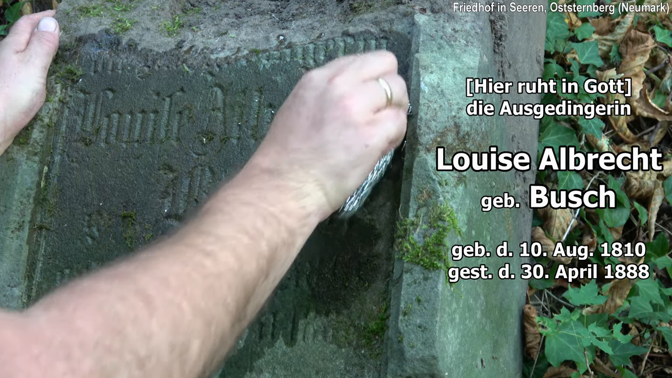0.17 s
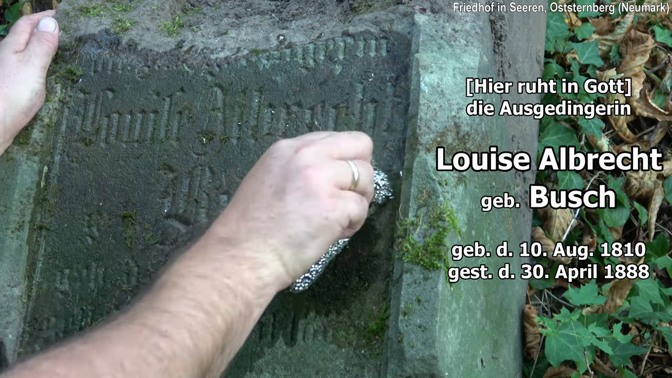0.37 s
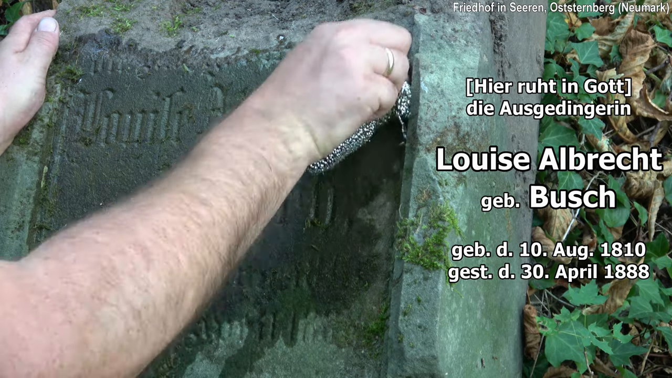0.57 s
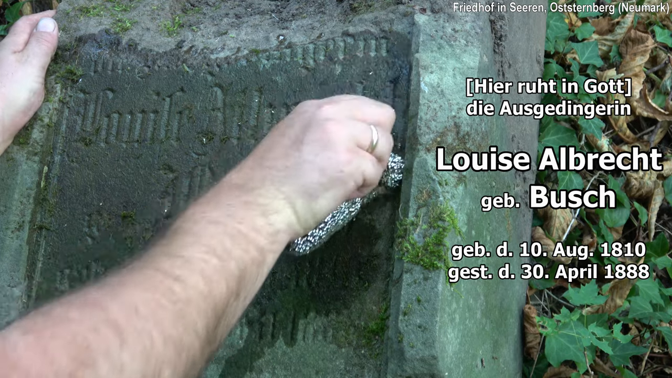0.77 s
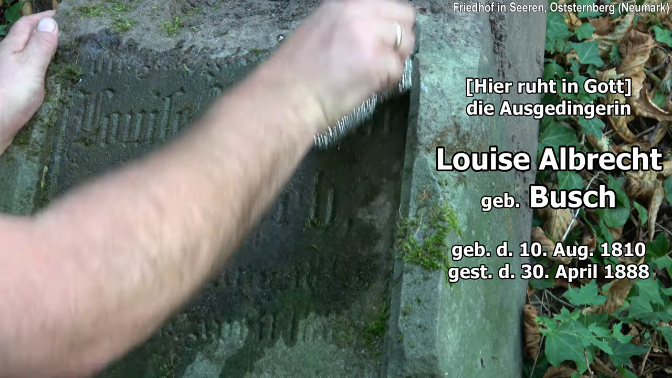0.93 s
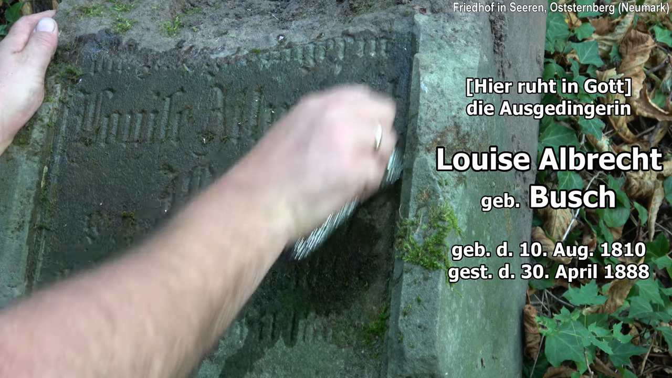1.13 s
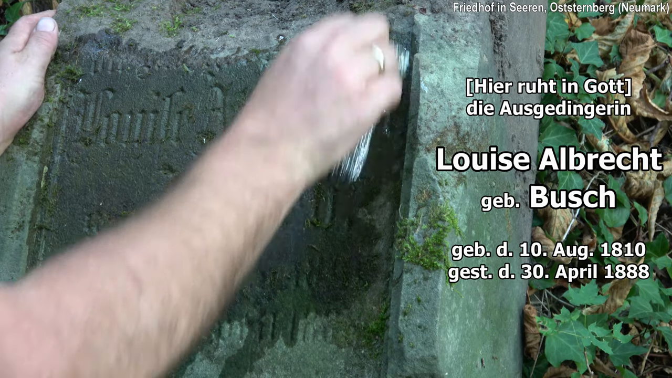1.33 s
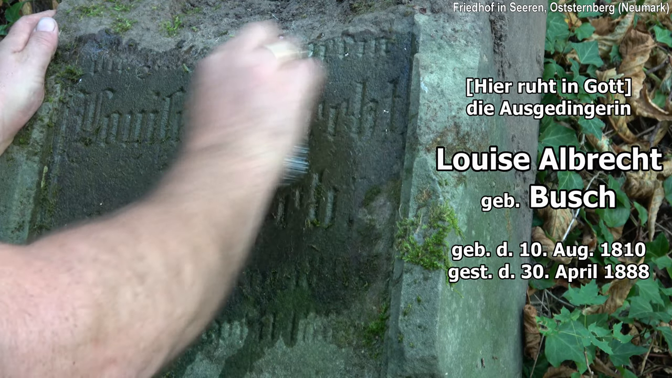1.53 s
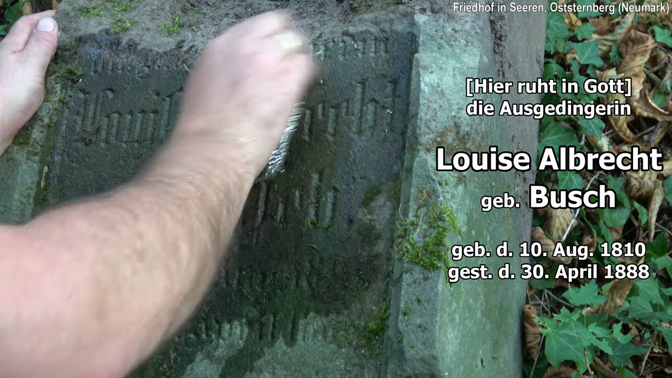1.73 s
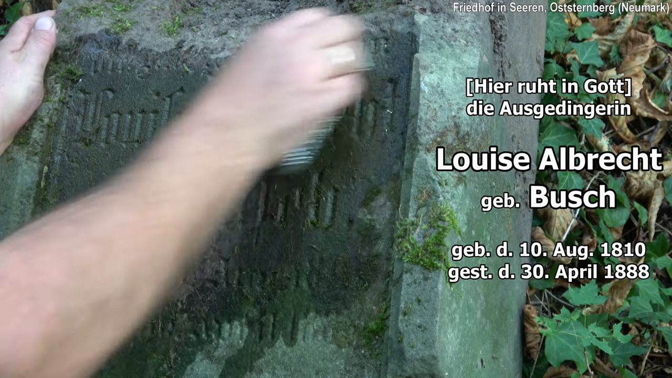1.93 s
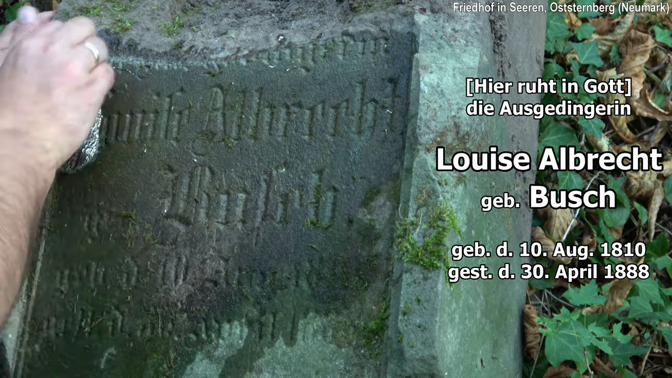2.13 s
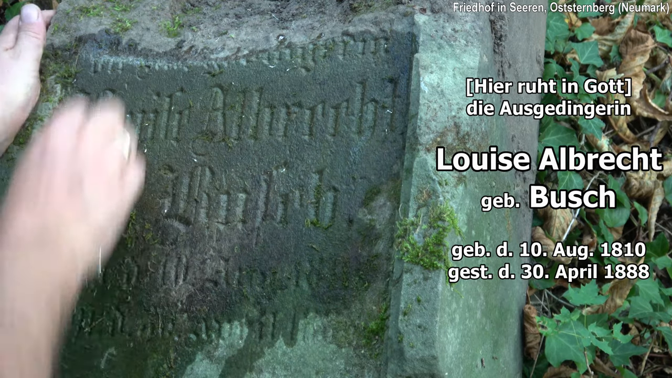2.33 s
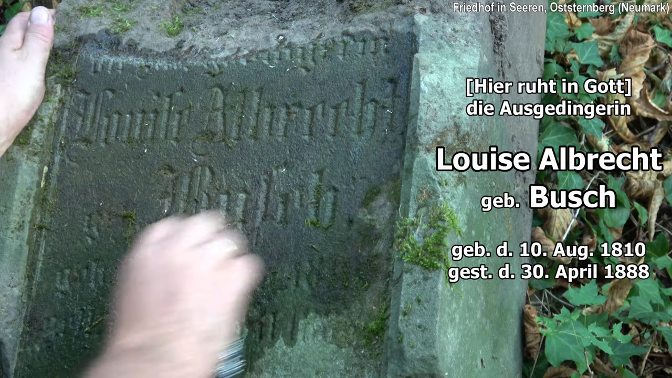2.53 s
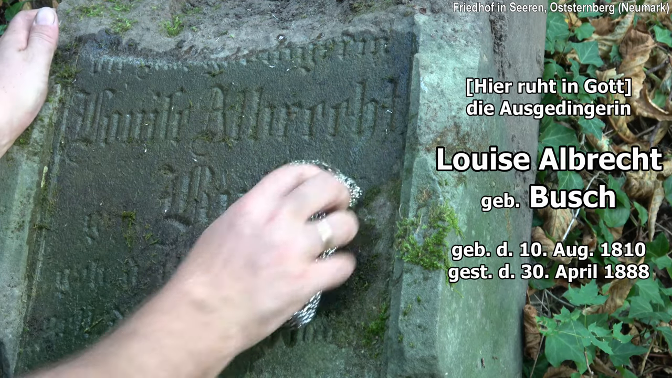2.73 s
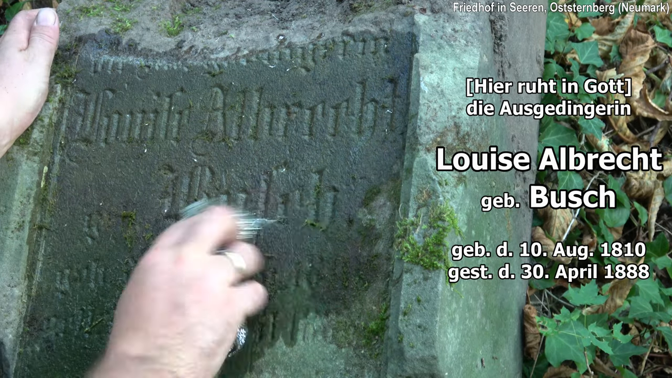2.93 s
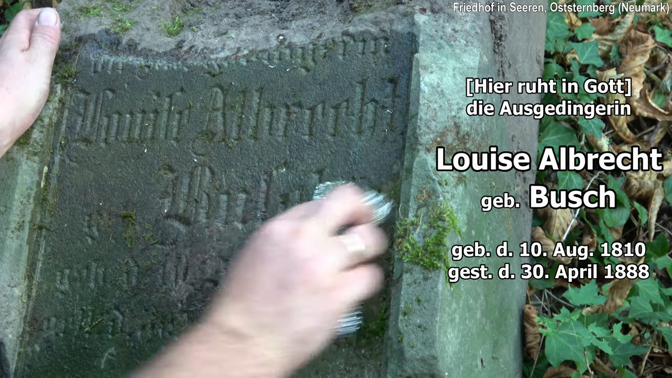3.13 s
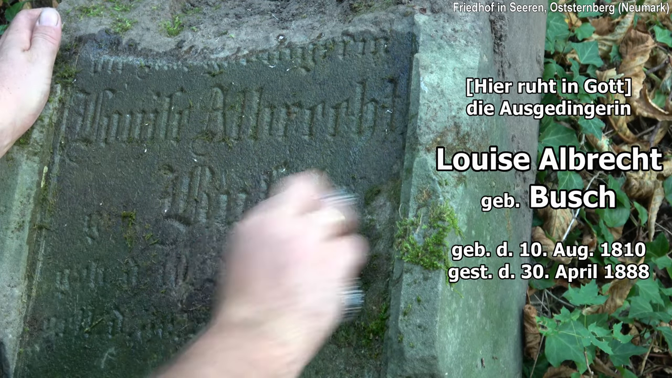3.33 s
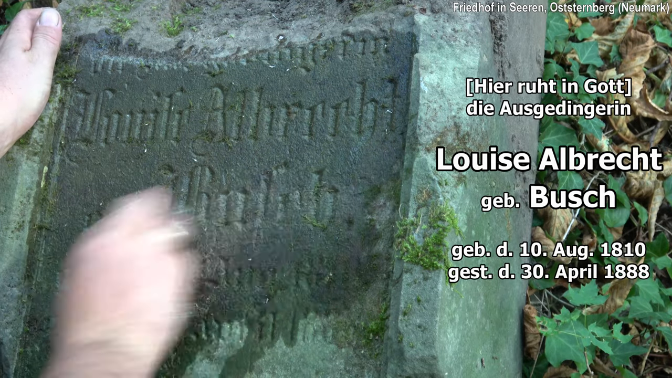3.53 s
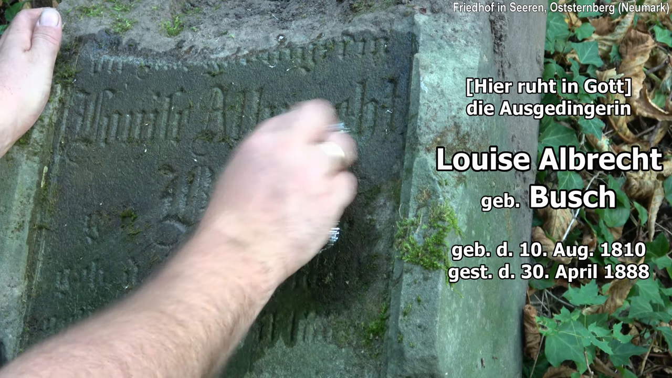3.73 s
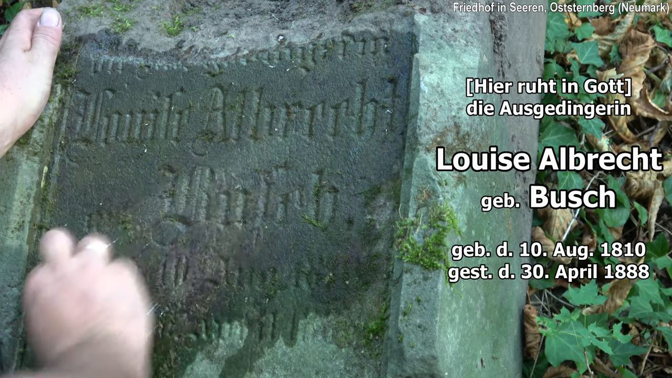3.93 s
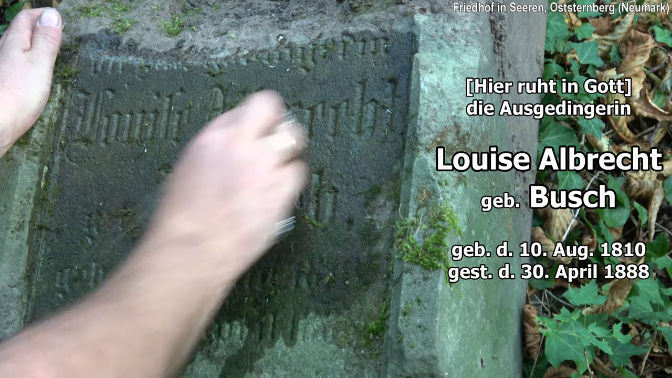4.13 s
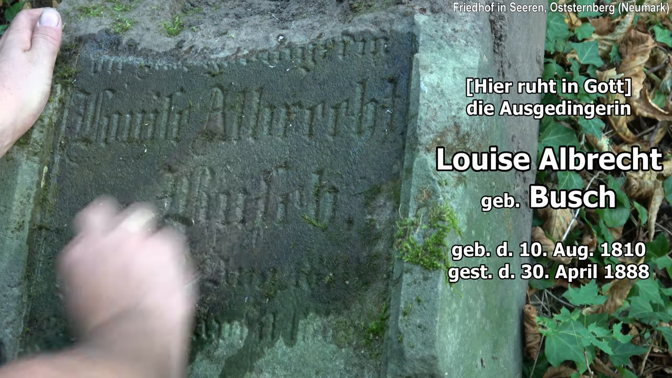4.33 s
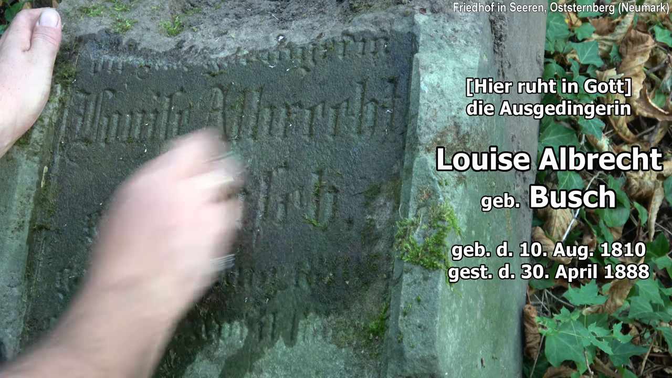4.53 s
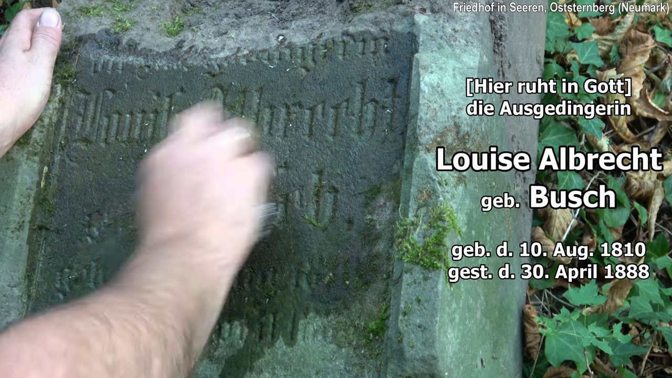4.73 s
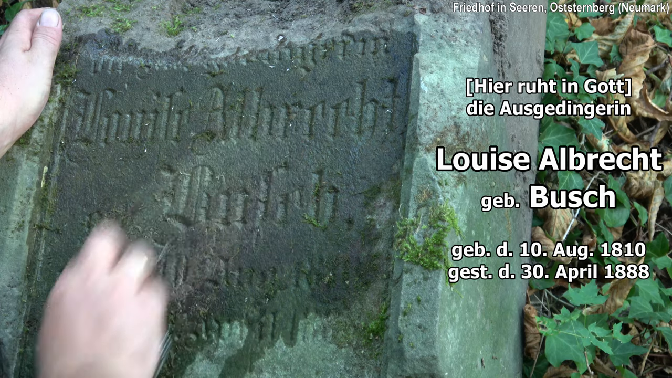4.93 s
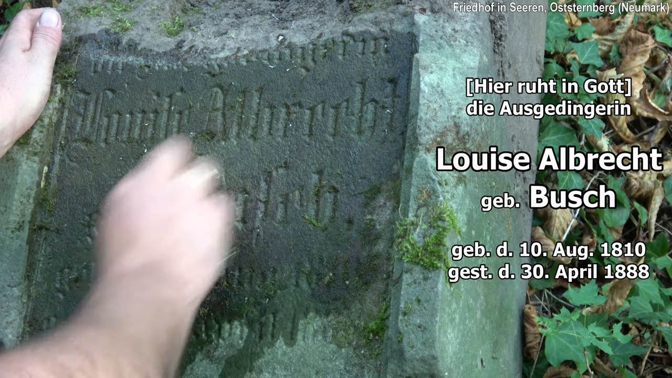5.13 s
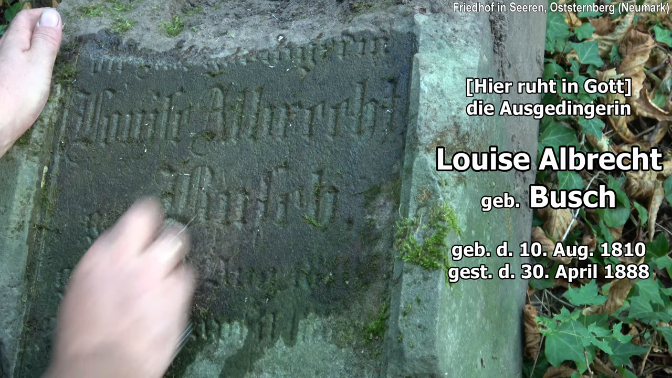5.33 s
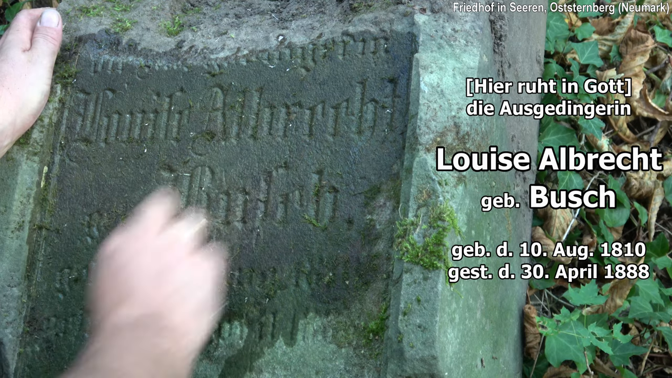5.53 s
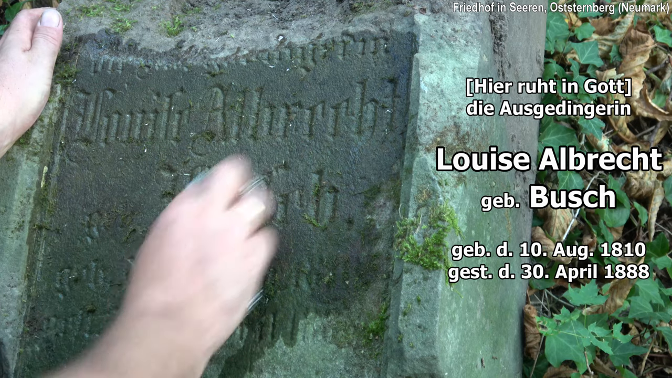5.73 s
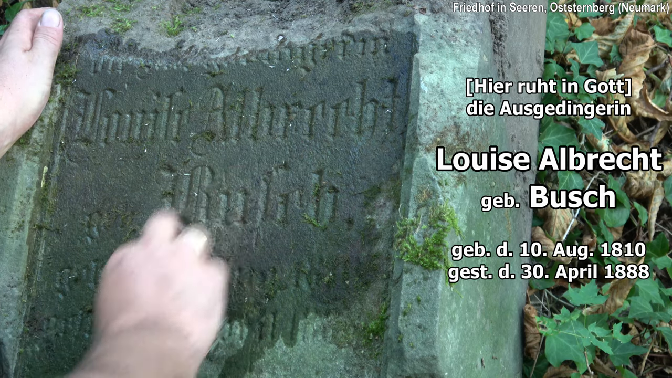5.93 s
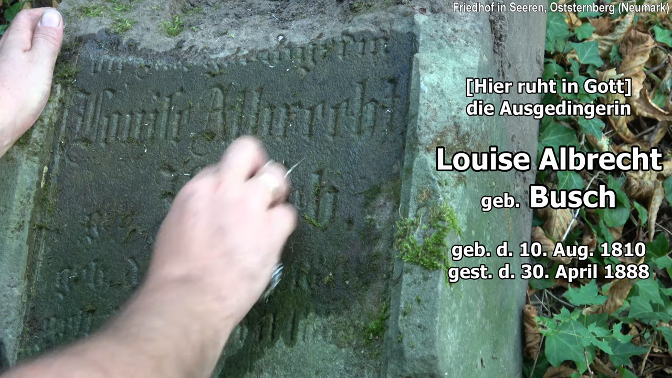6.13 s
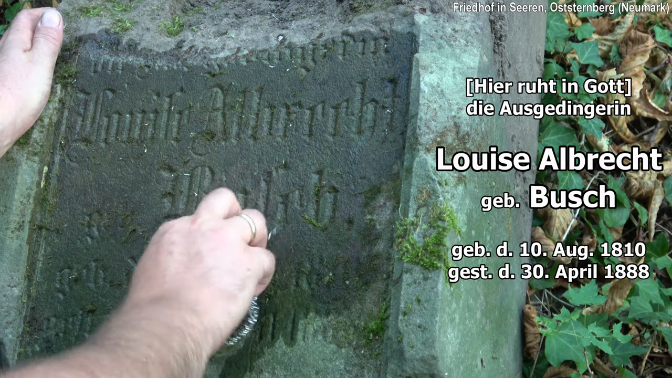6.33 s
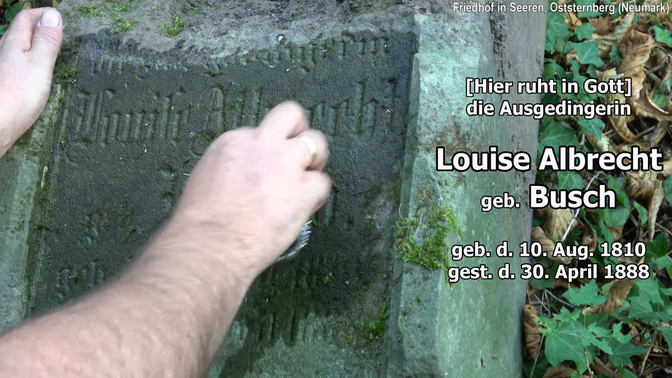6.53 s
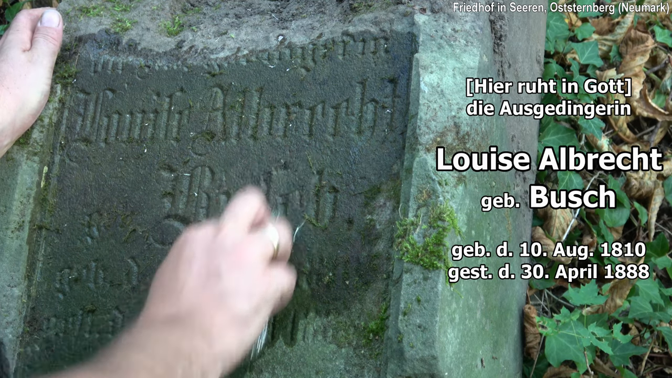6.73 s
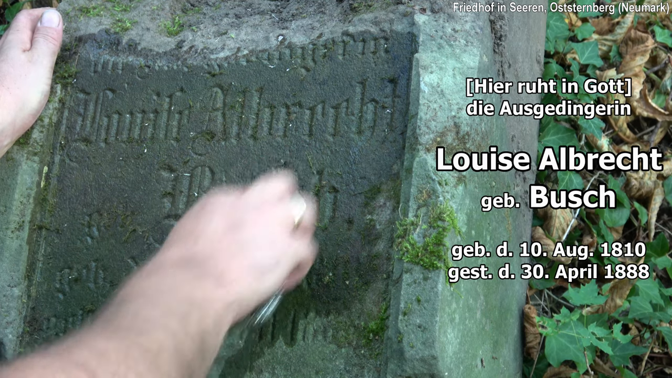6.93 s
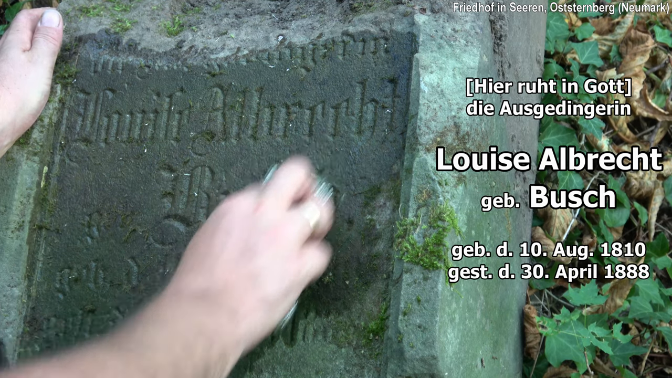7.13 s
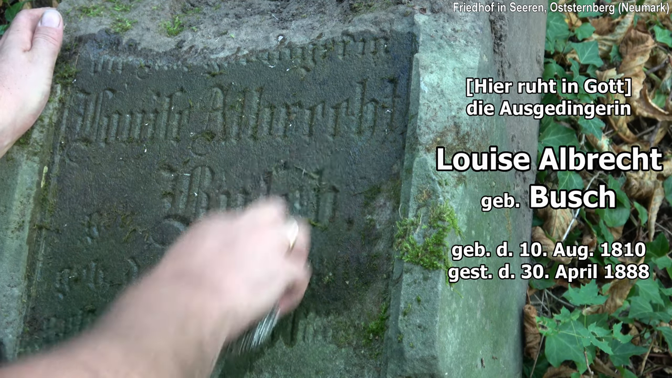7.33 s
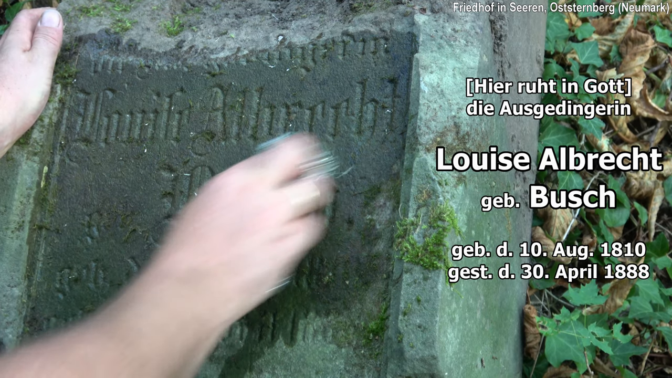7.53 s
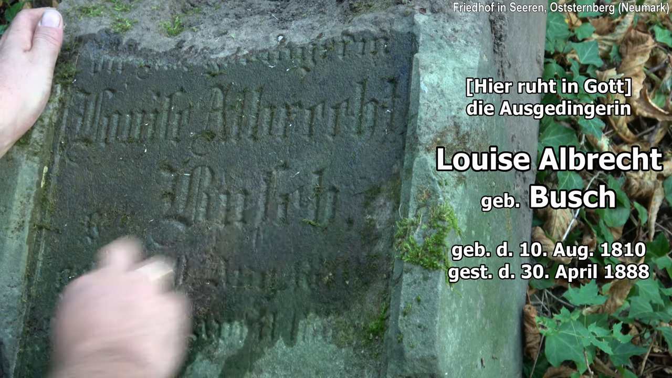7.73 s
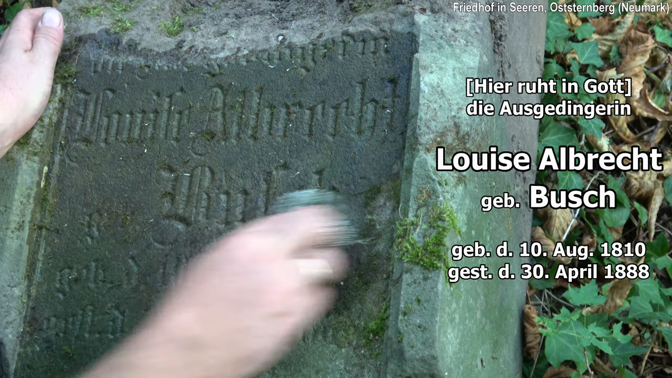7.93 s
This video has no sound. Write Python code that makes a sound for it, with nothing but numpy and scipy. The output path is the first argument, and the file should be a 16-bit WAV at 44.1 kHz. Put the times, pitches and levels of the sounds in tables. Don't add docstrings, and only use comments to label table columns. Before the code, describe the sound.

Outdoors, close to a small camera, a hand rubs a wire scouring pad over a rough engraved slab. Quick, bright, gritty strokes come in bursts, pause with a low wrist bump and small ticks, then resume in a long steady back-and-forth run. Afterwards the strokes become separate slow wipes, some very soft, ending with two firm ones. Faint motor whirr, distant rumble and air hiss lie underneath.

```python
import sys
import numpy as np
from scipy import signal
from scipy.io import wavfile
from scipy.ndimage import uniform_filter1d

SR = 44100
rng = np.random.default_rng(int(sys.argv[2]) if len(sys.argv) > 2 else 0)


def generate_wav(signal):
    frames = np.transpose(np.atleast_2d(signal))
    scaled = np.clip(frames, -1, 1) * 32767
    pcm = np.round(scaled).astype(np.int16)
    wavfile.write(sys.argv[1], SR, pcm)


def boost(x):
    u = np.asarray(x, float) / 20
    return 10 ** u


N = 351918


def evened(x):
    return x / np.sqrt(np.mean(abs(x) ** 2) + 1e-20)


def follow(points, t):
    return np.interp(t, *np.transpose(points))


def read(points, hz):
    f, value = np.transpose(points)
    return np.interp(np.log(hz + 1), np.log(f + 1), value)


def shape(points, hz):
    inside = (hz >= points[0][0]) * (hz <= points[-1][0])
    return evened(boost(read(points, hz)) * inside)[:, None]


def add(mix, s, sound):
    part = mix[round(s * SR):][:len(sound)]
    part += sound[:len(part)]


def patches(bins, frames, tall, long):
    z = rng.standard_normal((frames, bins)).T
    z = uniform_filter1d(z, max(1, round(tall)), 0)
    return evened(uniform_filter1d(z, max(1, round(long)), 1))


def wash(points, db, same, left_db, patchy_db, size):
    noise = rng.standard_normal((2, N))
    hz, t, (a, b) = signal.stft(noise, SR, nperseg=size, noverlap=size * 3 // 4)
    alike = np.clip(same(hz), 0, 1)[:, None]
    z = np.array([a, alike * a + np.sqrt(1 - alike ** 2) * b]) * shape(points, hz)
    drift_db = patchy_db * patches(len(hz), len(t), 6.0, 9.0)
    side_db = np.array([.5, -.5])[:, None, None] * left_db(hz)[:, None]
    z *= boost(drift_db + side_db)
    sound = signal.istft(z, SR, nperseg=size, noverlap=size * 3 // 4)[1][:, :N]
    return boost(db) * evened(sound)


def camera_whirr():
    # pitch_hz, level_db
    works = [(190, -22), (320, -14.5), (554, -4), (683, -8), (790, 1), (831, -4), (861, -8), (946, -3),
             (1120, -14.5), (1230, -10.5), (1390, -33), (1800, -40), (2340, -65), (3960, -120)]
    # pitch_hz, left_minus_right_db
    lean = [(200, 6), (300, 5), (700, 10.5), (1000, 4.5), (1400, -2.5)]
    return wash(works, -50, lambda hz: 0.96 + 0 * hz, lambda hz: read(lean, hz), patchy_db=-0.5, size=2048)


def camera_whine(hz, db, wander_hz):
    drift = uniform_filter1d(rng.standard_normal(N), size=500)
    drift = evened(uniform_filter1d(drift, size=500))
    tone = np.sin(2 * np.pi * np.cumsum(hz + wander_hz * drift) / SR)
    return boost(db) * tone * boost([[3.5], [-5.0]])


def far_rumble():
    # pitch_hz, level_db
    low_colour = [(8.8, -42), (15, -7), (40, -8), (75, 1), (113, -7.5), (140, -8), (162, -22), (194, -15),
                  (220, -16), (290, -54), (480, -120)]
    # time_s, level_db
    swell = [(0, -62.5), (2.2, -61.5), (3.3, -62), (5.05, -61.5), (5.2, -60), (6.55, -59), (6.85, -65),
             (7.67, -60.5), (7.98, -63)]
    swell_db = follow(swell, np.arange(N) / SR) + 0.91
    return wash(low_colour, swell_db, lambda hz: 1 - (hz / 450) ** 2, lambda hz: .4 + 0 * hz,
                patchy_db=0.8, size=4096)


def far_traffic():
    # pitch_hz, level_db
    drone_colour = [(140, -20), (170, 6), (200, -11), (260, 0), (330, -2.5), (400, -10)]
    # time_s, level_db
    loudness = [(2.4, -67), (5.0, -66.5), (6.1, -82), (7.3, -64), (7.8, -79), (7.98, -64)]
    drone_db = follow(loudness, np.arange(N) / SR) + 0.5
    return wash(drone_colour, drone_db, lambda hz: 0.86 + 0 * hz, lambda hz: hz / 60,
                patchy_db=2.5, size=2048)


def air_hiss():
    # pitch_hz, level_db
    hiss_colour = [(760, -38), (1300, 1), (1380, -5), (1780, -9.5), (9360, -15.5), (10500, -20),
                   (11400, -17), (12500, -19), (15600, -24)]
    # pitch_hz, likeness_0_to_1
    likeness = [(1400, 0.88), (3100, 0.85), (5000, 0.85), (6800, 0.16), (15000, 0.52)]
    return wash(hiss_colour, -61.5, lambda hz: read(likeness, hz), lambda hz: 1.3 + 0 * hz,
                patchy_db=0.0, size=512)


def slips(per_s, spread_db):
    size = boost(spread_db * np.minimum(rng.exponential(1, N), 5))
    sign = rng.choice([-1., 1.], N)
    return evened(size * sign * (rng.random(N) < per_s / SR))


def strokes(t):
    # grip_s, hold_s, pressure_db, lean_db (start to end), slab_body_db
    quick = [(0.045, 0.084, -30.0, -1.3, -3.5), (0.2, 0.16, -37, 4.5, -4.5), (0.461, 0.12, -31, -3.7, -7.5),
             (0.659, 0.11, -34, 2, -6.5), (0.853, 0.11, -32, -2.5, -7.5), (1.044, 0.16, -34, -4.5, -6),
             (1.454, 0.068, -29, -0.5, -3), (1.575, 0.054, -29, -4.5, -2.5),
             (1.687, 0.084, -28.5, -3.5, -4), (1.818, 0.058, -30.5, -1.5, -3.5),
             (1.937, 0.2, -28.0, 0.5, -3.5), (2.816, 0.16, -36.5, 10.5, -5.5),
             (3.024, 0.093, -31.5, -3.5, -7.5), (3.179, 0.089, -31.5, -0.5, -5.5),
             (3.324, 0.083, -33, -4, -5.5), (3.475, 0.11, -26.5, -2.5, -6), (3.647, 0.11, -27.5, 2.0, -5.5),
             (3.822, 0.12, -27.5, -8, -4), (3.994, 0.12, -29.6, 0, -4.5), (4.177, 0.13, -28.1, -5.5, -6.5),
             (4.344, 0.12, -28.5, -0.4, -6), (4.535, 0.095, -28, -2.5, -4.5), (4.687, 0.096, -28, 2.5, -7),
             (4.849, 0.18, -30.5, -11, -4)]
    slow = [
        (5.287, 0.16, -30.5, -9.5, -7),
        (5.721, 0.19, -34, -15, -3.5),
        (6.162, 0.15, -38.7, 3.5, -2),
        (6.308, 0.115, -41.5, -1.8, -5.5),
        (6.66, 0.21, -36, -7, -3.5),
        (7.143, 0.21, -37.5, -21.5, -5),
        (7.555, 0.15, -28.5, -12.5, -6.5),
        (7.952, 0.16, -28, -6.5, -3),
    ]
    # grip_s, hold_s, pressure_db
    brushes = [(1.224, 0.035, -54), (2.167, 0.031, -52), (2.206, 0.042, -45.5), (2.498, 0.068, -50.5),
               (2.655, 0.039, -55), (2.715, 0.09, -56), (2.783, 0.048, -46), (5.04, 0.053, -51),
               (5.205, 0.028, -50.3), (5.477, 0.029, -51.5), (5.647, 0.017, -54.3), (5.931, 0.029, -56),
               (6.096, 0.013, -62), (6.137, 0.026, -51), (6.61, 0.049, -53), (6.896, 0.034, -57),
               (7.062, 0.021, -62), (7.412, 0.059, -66), (7.88, 0.019, -57)]
    touches = [(*row, 0, -2.5) for row in brushes]
    quick_edges, slow_edges, touch_edges = (585, 879, 4, -1), (713, 581, 7, -6), (889, 730, 6.5, -.6)
    creep_db = -71.5
    knee_s = 0.0023
    power = boost(creep_db) ** 2 + 0 * t
    body = boost(creep_db) ** 2 + 0 * t
    for rows, edges in ((quick, quick_edges), (slow, slow_edges), (touches, touch_edges)):
        rise, fall, arch_db, thin_db = edges
        for grip, hold, press_db, lean_db, slab_db in rows:
            along = np.clip((t - grip) / hold, 0, 1) - .5
            before = knee_s * np.logaddexp(0, (grip - t) / knee_s)
            after = knee_s * np.logaddexp(0, (t - grip - hold) / knee_s)
            hold_db = press_db + lean_db * along - arch_db * (2 * along) ** 2
            stroke = boost(hold_db - rise * before - fall * after) ** 2
            power = power + stroke
            body = body + stroke * boost(slab_db + thin_db * along) ** 2
    return 10 * np.log10(power), 10 * np.log10(body / power)


def stone_and_wire(hz, t, fizz_db, slab_db):
    # pitch_hz, level_db
    grit_colour = [(1200, -78), (1900, -1.5), (2800, -1), (3700, -0.5), (4600, -2.5), (6000, -5.5),
                   (8000, -40)]
    # pitch_hz, level_db
    fizz_colour = [(3500, -24), (5000, -6.5), (6500, 0.5), (8000, 0), (10000, -1.5), (12500, -4.5),
                   (15000, -9), (16000, -23)]
    # pitch_hz, level_db
    slab_colour = [(250, -34), (500, -9.5), (800, -4.5), (1150, 0), (1500, 2.5), (1900, -4), (2400, -13),
                   (3200, -13)]
    # time_s, pitch_hz
    slab_ring = [(0, 1350), (.3, 1630), (1.2, 1700), (1.45, 1520), (1.6, 1560), (2.1, 1340), (3.3, 1400),
                 (3.55, 1350), (3.85, 1760), (4.2, 1450), (4.9, 1860), (5.35, 1250), (5.72, 1800),
                 (5.85, 1400), (6.7, 1660), (7.2, 1500), (7.6, 1690), (7.98, 1250)]
    fizz = shape(fizz_colour, hz) * boost(fizz_db - 1.03)
    slab = shape(slab_colour, hz) * boost(slab_db + 2.5)
    ring = np.exp(-((hz[:, None] - follow(slab_ring, t)) / 230) ** 2)
    slab = slab * boost(2.8 * ring - 3.0)
    return np.sqrt(shape(grit_colour, hz) ** 2 + fizz ** 2 + slab ** 2)


def cupped_hand(f, t):
    # time_s, echo_dip_hz, dip_db, hollow_ring_hz, ring_db
    hollow = [(0, 4500, -1.5, 6740, 4.5), (1.1, 4270, -3, 6460, 1.5), (1.498, 4900, -1.5, 6600, 2.5),
              (2.1, 4730, -4, 7500, -2), (2.9, 4400, 1.5, 6940, 1.5), (3.3, 5130, -1.5, 7040, 1.5),
              (4.4, 4940, -1, 6600, 0.5), (5, 4800, 1.3, 6360, 1.1), (5.8, 4530, -1.5, 7400, 2),
              (6.15, 4730, -1.1, 7540, 2.5), (6.42, 4100, -7, 7360, 3), (6.65, 5200, -9, 7400, 1),
              (6.9, 5170, -6, 7600, 2.5), (7.15, 5140, -7, 7450, -0.5), (7.35, 5200, -9.9, 7400, 2),
              (7.6, 5130, -2.5, 7360, -0.2), (7.98, 5000, 2, 7000, 2.5)]
    # time_s, pitch_hz
    ridge = [(0, 2830), (1.5, 3200), (3.3, 3350), (4.4, 2630), (5.4, 3200), (5.8, 2620), (6.42, 2400),
             (6.65, 2670), (7.35, 2300), (7.6, 2800), (7.98, 3800)]
    s, *columns = np.transpose(hollow)
    dip_hz, dip_db, ring_hz, ring_db = (np.interp(t, s, c) for c in columns)
    dip = dip_db * np.exp(-((f - dip_hz) / 450) ** 2)
    ring = ring_db * np.exp(-((f - ring_hz) / 900) ** 2)
    lift = (0.57 - 0.44 * dip_db) * np.exp(-((f - follow(ridge, t)) / 420) ** 2)
    return dip + ring + lift


def pad():
    # time_s, fizz_above_grit_db
    loose = [(0, 0.2), (1.2, 1), (1.45, 3.5), (1.75, 2.3), (2.12, 2), (2.95, 5), (3.2, 0.3), (3.35, 2),
             (3.9, 1.6), (4.9, 0.8), (5.35, 1.5), (5.8, 2.3), (6.3, 2.5), (6.75, 2.5), (7.2, 3), (7.33, 4),
             (7.6, 3.5), (7.98, 1)]
    # time_s, left_minus_right_db
    place = [
        [(0.0, 0), (1.2, -0.5)],
        [(1.45, -0.5), (2.12, 0.5)],
        [(2.85, 1), (5.0, 2)],
        [(5.28, 1.5), (5.9, 1)],
        [(6.15, 1.5), (6.9, 0.5)],
        [(7.12, 0.5), (7.7, 1)],
    ]
    train = slips(per_s=18000, spread_db=2.0)
    hz, t, (z, stray) = signal.stft([train, rng.standard_normal(N)], SR, nperseg=256, noverlap=192)
    f = hz[:, None]
    scrape_db, slab_db = strokes(t)
    loose_db = follow(loose, t)
    fizz_db = loose_db + 0.045 * (-25 - scrape_db)
    grit_db = scrape_db - 10 * np.log10(1 + boost(fizz_db) ** 2)
    sheen_db = 0.33 * (loose_db - 4.5) * np.clip((f - 9000) / 3000, 0, 1)
    flutter_db = 0.96 * patches(1, len(t), 1, 5.0)
    rings_db = 1.66 * patches(len(hz), len(t), 2.5, 26.0)
    level_db = grit_db + 0.19 + cupped_hand(f, t) + sheen_db + flutter_db + rings_db
    gain = stone_and_wire(hz, t, fizz_db, slab_db) * boost(level_db)
    apart = (0.007 + 0.057 * f / 15000) * boost(9.5 * patches(len(hz), len(t), 4.0, 21.0))
    left_db = follow(np.concatenate(place), t) + 2.8 * np.exp(-(f / 1900) ** 2)
    half = boost(left_db / 2)
    both = np.array([(z + apart * stray) * half, (z - apart * stray) / half]) * gain
    return signal.istft(both, SR, nperseg=256, noverlap=192)[1][:, :N]


def squeaks():
    # time_s, level_db, pitch_hz
    whistles = [
        [(1.32, -78, 11000), (1.36, -70, 12600), (1.41, -70, 14100)],
        [(7.825, -72, 11700), (7.85, -67, 13500), (7.862, -81, 14200), (7.875, -76, 14900), (7.885, -72, 15300)],
    ]
    out = np.zeros(N)
    for rows in whistles:
        s, db, hz = np.transpose(rows)
        t = np.arange(s[0], s[-1], 1 / SR)
        tone = np.sin(2 * np.pi * np.cumsum(np.interp(t, s, hz)) / SR)
        add(out, s[0], boost(np.interp(t, s, db)) * tone * signal.windows.tukey(len(t), .3))
    return out * boost([[2.5], [-2.5]])


def knocks():
    # start_s, level_db, pitch_hz, fade_by_60_db_s
    bumps = [
        (2.2, -25, 280, 0.025),
        (2.212, -31, 197, 0.027),
        (2.239, -37, 250, 0.034),
        (2.252, -34, 170, 0.022),
        (2.265, -54, 110, 0.067),
    ]
    out, t = np.zeros(N), np.arange(4000) / SR
    for s, db, hz, t60 in bumps:
        phase = 2 * np.pi * hz * (t - 3.6 * t ** 2)
        onset = (1 - np.exp(-t / 0.0022)) ** 2
        add(out, s, boost(db - 60 * t / t60) * onset * 2.5 * np.sin(phase))
    return out * boost([[.8], [-.8]])


def ticks():
    # start_s, level_db, ring_hz, click_share_0_to_1
    snaps = [(2.401, -38, 2800, .5), (2.4, -44, 5600, .0), (2.411, -40.5, 2400, 0.5),
             (2.47, -50, 13000, .3), (2.74, -42, 13000, .3), (2.76, -44, 13500, .5), (5.574, -49, 8000, .6),
             (5.948, -48, 8000, .3), (6.044, -52, 8500, .4), (6.139, -42, 12500, .4),
             (6.4365, -41, 3300, .15), (7.073, -46, 6000, .5)]
    out, t = np.zeros(N), np.arange(300) / SR
    clicks = uniform_filter1d(rng.standard_normal((len(snaps), 300)), size=2)
    for (s, db, hz, share), click in zip(snaps, clicks):
        ring = (1 - share) * np.sin(2 * np.pi * hz * t) * np.exp(-t * hz / 3.2)
        snap = share * click * 1.4 * np.exp(-t / .0007)
        add(out, s, boost(db) * (ring + snap))
    return out


def scene():
    camera = camera_whirr() + camera_whine(hz=779.4, db=-59, wander_hz=35.7)
    outdoors = far_rumble() + far_traffic() + air_hiss()
    return camera + outdoors + pad() + squeaks() + knocks() + ticks()


def low_pass(x):
    return signal.sosfilt(signal.butter(12, 15730, fs=SR, output="sos"), x)


def record(dry):
    return low_pass(dry)


dry = scene()
out = record(dry)
generate_wav(out)
```